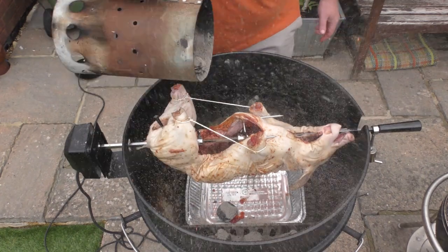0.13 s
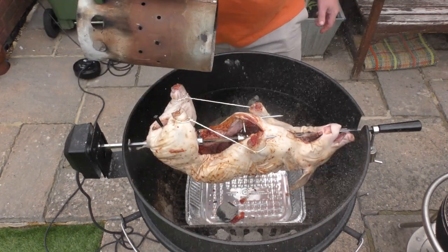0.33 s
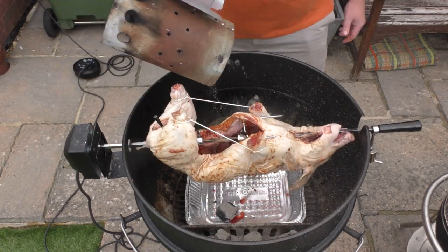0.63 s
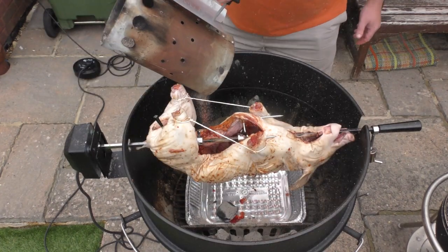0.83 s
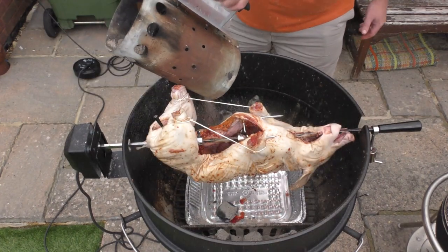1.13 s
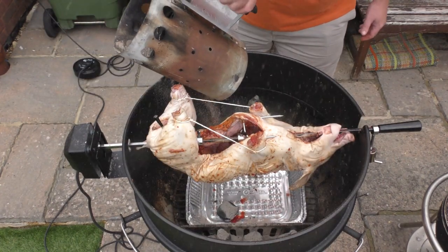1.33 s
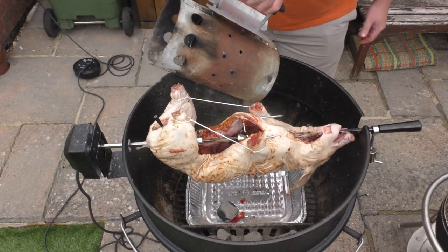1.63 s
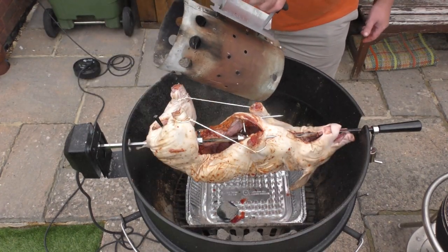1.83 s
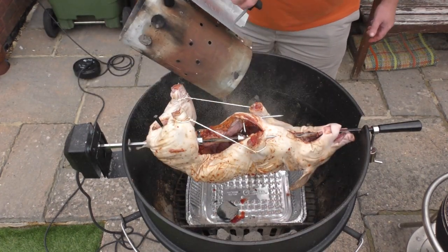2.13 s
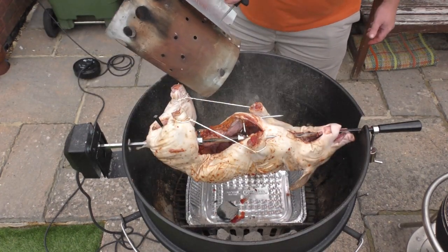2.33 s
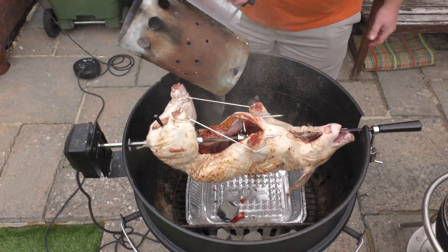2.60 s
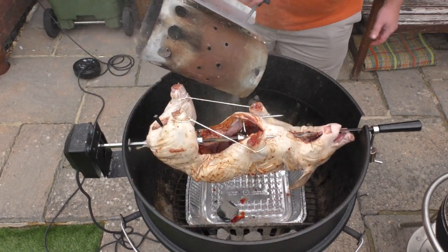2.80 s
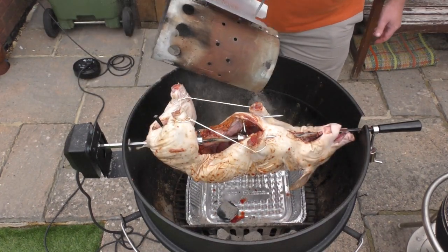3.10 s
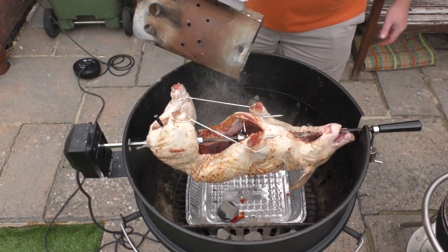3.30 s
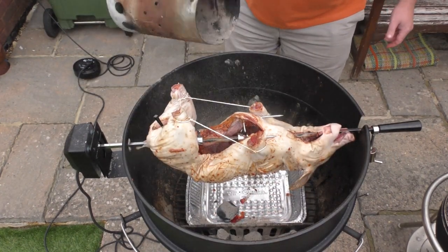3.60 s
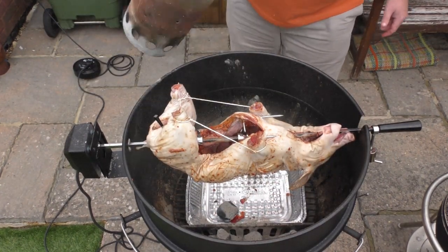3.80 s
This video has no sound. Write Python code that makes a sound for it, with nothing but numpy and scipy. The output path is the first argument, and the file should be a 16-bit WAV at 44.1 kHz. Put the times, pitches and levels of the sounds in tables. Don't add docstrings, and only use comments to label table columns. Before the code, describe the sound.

Charcoal lumps clatter into a steel kettle barbecue outdoors. Dull, short metallic thuds and cracks come at 0.15-0.55 s, another near 0.9. Gusts and flapping air dominate until about 1.95. A denser tumble runs 2.0-3.05, hardest around 2.3-2.45 and 2.7-2.85, with crumbs and ember spits. More knocks follow at 3.45, then a sharp bright crack at 3.8 and gritty trickle. Deep wind rumble overloads the close microphone; faint garden murmur behind.

```python
import sys
import numpy as np
from scipy import signal
from scipy.fft import rfft, irfft
from scipy.io import wavfile

SR = 44100
rng = np.random.default_rng(int(sys.argv[2]) if len(sys.argv) > 2 else 0)


def invert_db(x):
    u = np.asarray(x, float) / 20
    return 10 ** u


def wav_out(sig):
    wavfile.write(sys.argv[1], SR, np.round(np.clip(np.atleast_2d(sig).T, -1, 1) * 32767).astype(np.int16))


N = 174195
SPAN = 16384
HZ = np.maximum(np.arange(SPAN // 2 + 1) * SR / SPAN, 1)
HIT_T = np.arange(SPAN) / SR
T = np.arange(N) / SR
RISE_S = 0.0005


def rms_one(x):
    return x / np.sqrt(np.mean(x ** 2) + 1e-20)


def power_one(spectrum):
    return spectrum / np.sqrt(np.mean(abs(spectrum) ** 2))


def butter(order, hz, kind):
    return signal.butter(order, hz, kind, fs=SR, output="sos")


def in_time(rows):
    s, *columns = np.transpose(rows)
    return [np.interp(T, s, c) for c in columns]


def at_hz(points, hz):
    point_hz, db = np.transpose(points)
    return np.interp(np.log(hz), np.log(point_hz), db)


def coloured_noise(spectrum):
    hz = np.maximum(np.arange(N // 2 + 1) * SR / N, 1)
    return rms_one(irfft(rfft(rng.standard_normal(N)) * invert_db(at_hz(spectrum, hz)), N))


def drift(rate_hz):
    r = np.exp(-2 * np.pi * rate_hz / SR)
    wander = signal.lfilter([1], [1, -2 * r, r * r], rng.standard_normal(N + SR))
    return rms_one(wander[SR:])


def grains(per_s, spread_db, size):
    strength = invert_db(spread_db * np.minimum(rng.exponential(1, size), 5))
    sign = rng.choice([-1, 1], size)
    return strength * sign * (rng.random(size) < per_s / SR)


def spectra(modes):
    hz, db, t60 = np.transpose(modes)[:, :, None]
    t = np.arange(SPAN // 2) / SR
    decay = invert_db(db - 60 * t / np.clip(t60, .003, .2))
    return rfft(decay * np.sin(2 * np.pi * hz * t), SPAN)


def response(rows, gains_db):
    return power_one(invert_db(gains_db) @ rows)


def burst(t60):
    hold_s = 0.21 * max(t60 - 0.24, 0)
    body = invert_db(-60 * np.maximum(HIT_T - hold_s, 0) / t60)
    tail = invert_db(-26 - 60 * HIT_T / (9.1 * t60))
    shape = (body + tail) * np.minimum(HIT_T / RISE_S, 1) * (HIT_T < .25)
    contacts = rms_one(grains(9000, 1.5, SPAN))
    return rfft(contacts * shape)


def add(out, s, sound):
    i = int(s * SR)
    out[i:i + SPAN] += sound


# (frequency [Hz], level [dB])
GARDEN = [(150, -15.5), (250, -34), (427, 3.5), (991, 0), (5340, -19.5), (7500, -48), (15600, -95)]


def garden():
    return invert_db(-51 + 0.3 * drift(1.9)) * coloured_noise(GARDEN)


# (time [s], peak [dB])
SLAPS = [(0.67, -19), (0.804, -26), (0.888, -21.5), (0.94, -16), (1.014, -29), (1.074, -27), (1.154, -26),
         (1.248, -35), (1.345, -31), (1.559, -40), (1.644, -29), (1.785, -35.5), (1.872, -30), (3.242, -40),
         (3.432, -23), (3.529, -33), (3.617, -39)]


def slaps():
    width_s, trim_db = .012, -5
    return sum(invert_db(db + trim_db) * np.exp(-((T - s - width_s / 2) / width_s) ** 2) for s, db in SLAPS)


# (time [s], level [dB])
GUST = [(0,-20.5),(.15,-11),(.36,-10),(.45,-13),(.62,-20),(.68,-6.5),(.95,-5),(1.35,-9),(1.9,-11),(2.0,-15),(2.17,-7),(2.35,-13.5),(2.66,-24.5),(2.95,-14.5),(3.25,-9),(3.39,-17),(3.55,-3.5),(3.88,-19)]
# (frequency [Hz], level [dB])
WIND = [(7.1, -5.5), (12, 13.5), (27, 4.5), (57, -2), (111, -14.5), (300, -49), (390, -68), (660, -120)]


def wind():
    level_db, = in_time(GUST)
    lump_db = 2.5 * drift(18)
    rumble = coloured_noise(WIND)
    calm_s, calm_hz = 2.01, 51
    calm = np.clip((T - calm_s) * 5, 0, 1)
    deeper = signal.sosfiltfilt(butter(2, calm_hz, "low"), rumble)
    rumble = rumble + calm * (deeper - rumble)
    puffs = rms_one(signal.sosfilt(butter(3, [60, 260], "band"), rng.standard_normal(N)))
    puff_db = level_db - 36.5 + 0.57 * (level_db + 3.5 + lump_db) + 4.2 * drift(10.0)
    return invert_db(level_db) * rms_one(rumble * invert_db(lump_db)) + (invert_db(puff_db) + slaps()) * puffs


# (time [s], level [dB], share on the bowl [dB])
FLOW = [(0,-44.5,7.5),(.11,-47.5,-0.5),(.17,-31,-24.5),(.36,-37.5,4.5),(.62,-43.5,1),(.7,-59.5,-9),(1.9,-51,-0.5),(1.99,-44,-26),(2.2,-39,-1),(2.55,-34,0),(2.66,-58,-5),(2.95,-33.5,-11),(3.2,-47.5,6),(3.3,-44.5,5),(3.55,-34,-10.5),(3.72,-40,-0.5),(3.84,-19,-21),(3.95,-25.5,-2.5)]
# (frequency [Hz], level [dB])
CRUMB = [(530, -57), (900, -1.5), (1800, 1.5), (2250, 1), (3000, 2.5), (4280, -2), (5700, -3),
         (6900, -14.5), (15500, -19)]
# (frequency [Hz], level [dB], t60 [s])
BOWL = [(390, -34, 0.082), (470, -7, 0.06), (514.6, 10, 0.028), (593, -4.5, 0.16), (705, 1.5, 0.029),
        (767.4, 10.5, 0.021), (940, 9.5, 0.017), (1157, 5, 0.018), (1326, -2, 0.062), (1410, -17, 0.22),
        (2200, -5.5, 0.061)]
# (frequency [Hz], level [dB], t60 [s])
GRATE = [(2550,-4,.025),(2950,0,.04),(3200,-3,.02),(3620,-4,.02),(4460,-6,.015),(5010,-6,.012),(5480,-4,.015)]


def trickle():
    level_db, bowl_db = in_time(FLOW)
    clicks = grains(3000 * invert_db(4.5 * drift(21)), 2, N)
    pitches = np.geomspace(1000, 14000, 24)
    dealt = rng.integers(0, 24, N)
    ring_cycles = 26.5
    crumbs = np.zeros(N)
    for k, hz in enumerate(pitches):
        r = invert_db(-60 * hz / (ring_cycles * SR))
        w = 2 * np.pi * hz / SR
        own_clicks = clicks * (dealt == k) + 1e-18
        ring = signal.lfilter([0, 1], [1, -2 * r * np.cos(w), r * r], own_clicks)
        crumbs += rms_one(ring) * invert_db(at_hz(CRUMB, hz)) * np.sqrt(hz)
    bowl, grate = [
        rms_one(signal.fftconvolve(clicks, irfft(response(spectra(modes), np.zeros(len(modes)))))[:N])
        for modes in (BOWL, GRATE)]
    return invert_db(level_db - 2) * (rms_one(crumbs) + invert_db(-28.0) * grate + invert_db(bowl_db) * bowl)


# (time [s], peak [dB], duller part [dB])
SPITS = [(0.2575, -29, -4), (0.391, -36, -4), (0.5382, -28.5, -8), (0.822, -25, 7), (0.902, -37, -4),
         (1.19, -43.5, 8.5), (1.2143, -43, 0), (1.9764, -45, -4), (2.12, -36, -4), (2.262, -23.5, -11),
         (2.3072, -24.5, 4), (2.3501, -33, -4), (2.411, -31, -4), (2.4462, -22.5, -10), (2.6359, -37.5, -6),
         (2.652, -28, -10), (2.6838, -34, -4), (2.7077, -29.5, -16), (2.7657, -23, -4), (2.834, -40, -4),
         (2.8519, -31, -4), (2.9007, -23.5, -1), (2.9227, -23.5, 2), (2.952, -33, 1), (3.0594, -31, -6),
         (3.1807, -23, -4), (3.3135, -28, 4), (3.3837, -31, 8.5), (3.4185, -31.5, -7), (3.4605, -28.5, -7),
         (3.4988, -17, 2), (3.5763, -23, -4), (3.6247, -39, -4), (3.6556, -28, 1), (3.7057, -24.5, 6),
         (3.7357, -26.5, -4), (3.7733, -33, -4), (3.7953, -22, -4), (3.813, -21, -7), (3.8655, -24, -6),
         (3.9409, -15, -15)]


def spits():
    out = np.zeros(N + SPAN)
    hold_s, level_db, t60_s, split_hz = 0.0022, -6.5, 0.04, 6300
    shape = invert_db(level_db - 60 * np.maximum(HIT_T - hold_s, 0) / t60_s)
    top = butter(3, split_hz, "high")
    body = butter(2, [2600, split_hz], "band")
    for s, db, dull_db in SPITS:
        grit = rms_one(grains(12000, 3.3, SPAN)) * shape
        hiss = signal.sosfilt(top, grit)
        dull = signal.sosfilt(body, grit)
        add(out, s, invert_db(db) * (hiss + invert_db(dull_db) * dull))
    return out[:N]


# (time [s],
# peak [dB], pitch [Hz], t60 [s])
KNOCKS = [(.21,-28.5,1940,0.19),(.392,-23,1880,0.044),(.454,-19,747,0.039),(.821,-34,2200,0.11),(1.977,-25.5,314,0.045),(1.994,-32.5,2970,0.26),(2.055,-32,1250,.06),(.904,-22.5,1200,0.033),(2.232,-29,2180,0.093),(2.315,-14.5,2820,0.038),
          (2.315,-13,686,0.039),(2.418,-33,860,0.033),(2.43,-17,2940,.03),(2.47,-19,1230,.13),(2.565,-30,2950,0.28),(2.683,-24,1190,0.024),(2.701,-20.5,580,0.035),
          (2.714,-18,1610,0.071),(2.835,-25,510,0.03),(2.859,-11.5,473,0.041),(3.46,-27,3030,.04),(3.773,-25,7750,0.036),
          (3.795,-20,7900,0.037),(3.808,-16,3050,0.044),(3.053,-19.5,312,0.045),(3.741,-25,3110,0.085),(3.944,-15,5300,0.02)]


def knocks():
    out = np.zeros(N + SPAN)
    for s, db, hz, t60 in KNOCKS:
        partner_hz = 1.04 * hz
        pair = np.sin(2 * np.pi * hz * HIT_T) + 0.52 * np.sin(2 * np.pi * partner_hz * HIT_T)
        decay = invert_db(db + 0.5 - 60 * HIT_T / max(t60, .01))
        add(out, s, decay * np.minimum(HIT_T / RISE_S, 1) * pair)
    return out[:N]


def dust():
    edge = signal.sosfreqz(butter(2, 900, "high"), HZ, fs=SR)[1]
    return power_one(invert_db(at_hz(CRUMB, HZ)) * edge)


# (time [s], peak [dB], pitch [Hz], t60 [s])
CRACKS = [(0.15,-35,4920,0.51),(.256,-20,3270,0.11),(.388,-13,2560,0.13),(.537,-14,3540,0.054),(0.818,-21,5430,0.08),(.877,-34.5,4850,0.051),(1.975,-19.5,2900,0.064),
          (2.121,-26,4450,0.15),(2.26,-21,5860,0.046),(2.652,-17,3970,0.053),(2.765,-13,3720,0.24),(2.853,-13,3430,0.072),(2.957,-25,7500,0.044),(3.056,-24,5100,0.36),
          (3.181,-21.5,6000,0.054),(3.451,-17.5,4980,0.31),(3.657,-18.5,3330,0.065),(3.737,-17.5,3200,0.042),(3.772,-4.5,4830,0.074)]
# (time [s], peak [dB], pitch [Hz], t60 [s])
SPLINTERS = [(2.304,-26,5280,0.078),(2.314,-14.5,5050,0.037),(2.417,-19,5100,0.053),(3.794,-15.5,5700,0.091),(3.941,-14.5,5230,0.035)]


def cracks():
    out = np.zeros(N + SPAN)
    crumble = dust() * (HZ / (HZ - 2200j)) ** 2
    air = invert_db(-37) * (HZ / (HZ - 6000j)) ** 2
    width_oct, ring_cycles = 0.21, 23.3
    mode_db = np.array([0.87, -1.1, 0.5, -0.83])
    for s, db, hz, t60 in CRACKS + SPLINTERS:
        scatter_oct = width_oct * rng.standard_normal(4) * [0.18, 1.93, 0.56, 2.42]
        pitches = np.clip(hz * 2 ** scatter_oct, 1500, 14000)
        own = response(spectra([(p, 0, ring_cycles / p) for p in pitches]), mode_db)
        body = own + invert_db(-1.5) * crumble + air
        add(out, s, invert_db(db - 4.5) * irfft(burst(max(t60, .01)) * body))
    return out[:N]


# (time [s], peak [dB])
BOOMS = [(0.388,-12.5),(0.544,-19),(2.31,-15.5),(2.419,-16.5),(2.473,-32),(2.705,-15.5),(3.05,-24.5),(3.806,-19)]


def booms():
    out = np.zeros(N + SPAN)
    boom_hz, t60_s, swell_s = 180.3, 0.12, 0.00099
    tone = (1 - np.exp(-HIT_T / swell_s)) * np.sin(2 * np.pi * boom_hz * HIT_T)
    for s, db in BOOMS:
        add(out, s, invert_db(db - 60 * HIT_T / t60_s) * tone)
    return out[:N]


# (time [s], peak [dB], brightness [dB], tumble t60 [s], favoured pitch [Hz])
THUDS = [(0.141, -21.5, -9.5, 0.37, 524), (0.211, -45, 3, 0.14, 1940), (0.252, -21, 0.5, 0.24, 436),
         (0.392, -6.5, -4.5, 0.18, 456), (0.449, -13, -10.5, 0.25, 454), (0.545, -13.5, -9.5, 0.2, 490),
         (0.897, -11, -8, 0.14, 1270), (1.261, -47, -7, 0.15, 404), (1.974, -24, -0.5, 0.53, 865),
         (2.122, -19, -36, 0.2, 473), (2.262, -27.5, 11.5, 0.095, 530), (2.313, -8, -10.5, 0.26, 466),
         (2.41, -7.5, -9.5, 0.3, 675), (2.527, -21, -2, 0.39, 435), (2.682, -23, -3.5, 0.45, 1100),
         (2.708, -9.5, -6, 0.1, 1500), (2.762, -22, -2.5, 0.5, 455), (2.833, -20, -18.5, 0.36, 452),
         (2.857, -6.5, -10.5, 0.1, 423), (2.923, -12.5, -5, 0.15, 530), (3.05, -15, 3, 0.35, 715),
         (3.451, -12.5, 3.5, 0.27, 630), (3.806, -8, 1.5, 0.26, 760)]


def thuds():
    out = np.zeros(N + SPAN)
    clatter = invert_db(-5) * 4 * signal.sosfreqz(butter(3, [370, 1900], "band"), HZ, fs=SR)[1]
    bowl, grate = spectra(BOWL), spectra(GRATE)
    bowl_hz = np.array(BOWL)[:, 0]
    crumble = dust() / (1 + 1j * HZ / 7000) ** 3
    favour_db, favour_oct, scatter_db = 3.5, 0.66, 5.5
    for s, db, bright_db, t60, hz in THUDS:
        favour = favour_db * np.exp(-(np.log2(bowl_hz / hz) / favour_oct) ** 2)
        low = response(bowl, favour + rng.normal(0, scatter_db, len(BOWL))) + clatter
        rattle = response(grate, rng.normal(0, scatter_db, len(GRATE)))
        high = invert_db(-8.5) * rattle + crumble
        add(out, s, invert_db(db - 9) * irfft(burst(max(t60, .02)) * (low + invert_db(bright_db) * high)))
    return out[:N]


# (delay [s], level [dB])
ECHOES = [(.011, -20)]


def scene():
    coals = thuds() + booms() + cracks() + trickle() + spits() + knocks()
    wet = coals.copy()
    for s, db in ECHOES:
        lag = int(s * SR)
        wet[lag:] += invert_db(db) * signal.lfilter([.4], [1, -.6], coals[:-lag])
    return (wet + garden() + wind())[None]


def low_pass(x):
    return signal.sosfilt(signal.butter(12, 15670, fs=SR, output="sos"), x)


def record(dry):
    limit = .68
    slow = signal.sosfiltfilt(butter(2, 150, "low"), dry)
    rounded = slow / (1 + abs(slow / limit) ** 4) ** .25
    treble_cut = signal.cheby2(10, 40, 15900, fs=SR, output="sos")
    mix = signal.sosfilt(treble_cut, rounded + dry - slow)
    return low_pass(mix)


dry = scene()
out = record(dry)
wav_out(out)
```